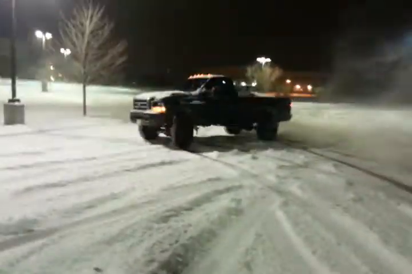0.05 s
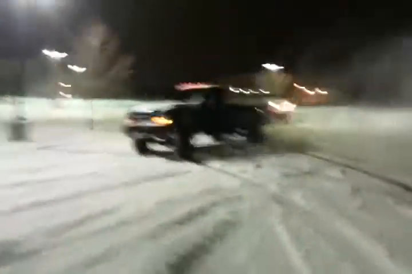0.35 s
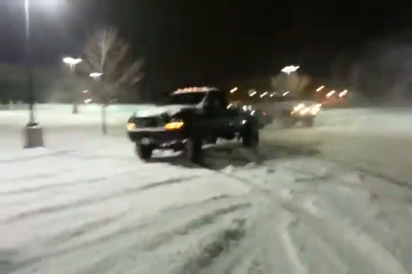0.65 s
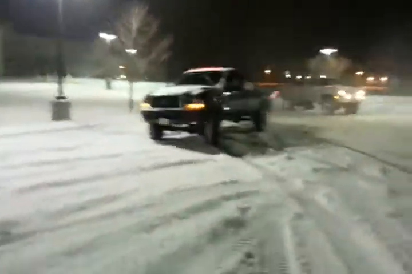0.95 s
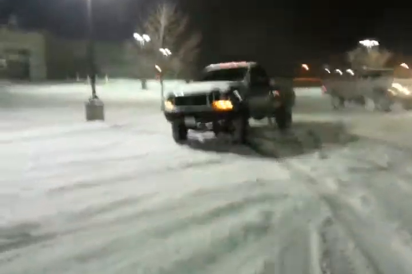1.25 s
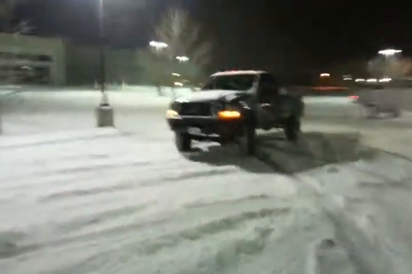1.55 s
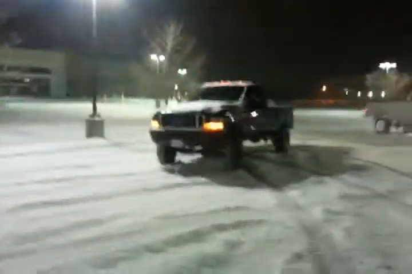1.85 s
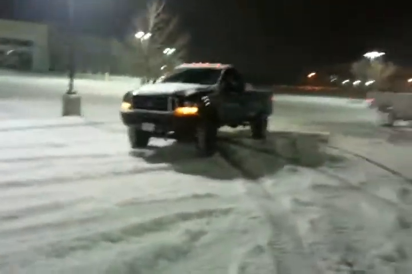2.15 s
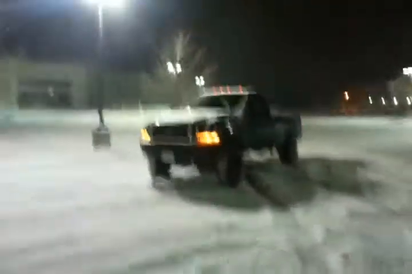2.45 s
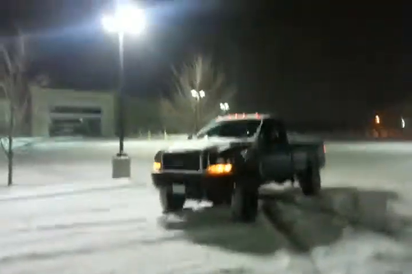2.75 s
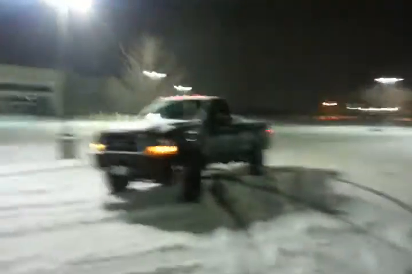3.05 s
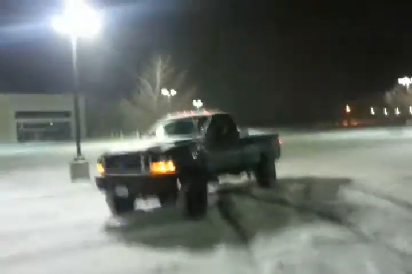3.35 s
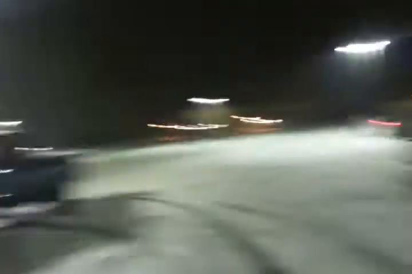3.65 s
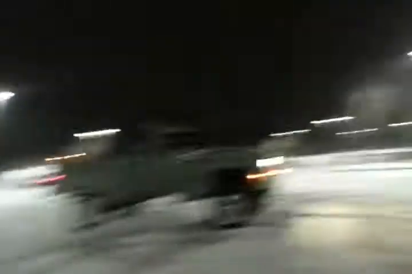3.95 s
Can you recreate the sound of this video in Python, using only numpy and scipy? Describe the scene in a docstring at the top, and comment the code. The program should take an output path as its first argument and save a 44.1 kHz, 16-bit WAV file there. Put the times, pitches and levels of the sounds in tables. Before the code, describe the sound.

A pickup truck's engine passes close by, with tyres churning snow throughout. Its turbo flutters in fast chuffs that slow, quicken and fade by 1.3 seconds. From about 1 second the exhaust swells into a deep, rising drone with some rasp and a faint hiss. Near 3 seconds it drops to a ragged burble. Around 3.7 seconds comes a dull snow scrunch, then a few sharp clicks on the right.

```python
"""A snowy car park, a V8 pickup sliding past close to a stereo microphone, tyres churning the snow.
First the turbo flutters: air blown back through it in fast chuffs that slow, quicken and die by 1.3 s
as the engine takes load. Uneven firings ring the exhaust pipe in a drone, with a rasp from the engine
bay and a hiss at the intake. Near 3 s, off the throttle, the drone falls into a ragged burble.
Last, a wheel ploughs through deeper snow and a few sharp clicks sound on the right."""
import sys
import numpy as np
from scipy import signal
from scipy.fft import rfft, irfft
from scipy.io import wavfile
from scipy.ndimage import uniform_filter1d

SR = 44100
rng = np.random.default_rng(int(sys.argv[2]) if len(sys.argv) > 2 else 0)


def file_out(sig):
    """Save sig as 16-bit WAV at sys.argv[1]."""
    # one column per channel
    cols = np.atleast_2d(sig).T
    # limit, then scale
    lim = np.clip(cols, -1, 1)
    pcm = np.round(lim * 32767).astype(np.int16)
    wavfile.write(sys.argv[1], SR, pcm)


N = 176400
T = np.arange(N) / SR

# engine speed (t/s, four-stroke cycles/Hz)
ENGINE_SPEED = [(0, 12.4), (.7, 12.2), (1.0, 15.1), (1.25, 17.1), (1.5, 18.3), (1.78, 18.6), (2.08, 18.6),
                (2.25, 19.95), (2.45, 19.6), (2.58, 20.2), (2.78, 20.55), (2.945, 19.6), (3.0, 16.2),
                (3.1, 14.6), (3.16, 17.6), (3.5, 17.5), (3.72, 14.5)]
# manner of firing (t/s, exponent on cylinder strength, roughness 0-1)
FIRING = [(0, 1.3, 0.26), (.85, 1.2, 0.32), (1.1, 0.21, 0.19), (1.4, 0.64, 0.16), (2.1, 1.1, 0.08),
          (2.3, 0.79, 0.11), (2.88, 0.98, 0.14), (3.05, 0.82, 0.14), (3.25, 1.3, 0.55)]
# cylinders in firing order (relative strength); (1 on the far bank, else 0)
CYLINDER_STRENGTH = [1.05, 1.48, 1.16, 0.77, 0.26, 2.3, 0.21, 1.58]
FAR_BANK = [1, 0, 1, 0, 0, 1, 0, 1]
# exhaust pipe resonances (f/Hz, gain/dB)
PIPE_COLOUR = [(25, -44), (60, -44.5), (100, -9), (130, 4), (155, 1.5), (185, -4), (220, -4), (265, -8.5),
               (312, -7), (345, -32), (400, -57), (700, -48), (1500, -78)]
# the pipe's low drone and the bark of its upper orders (t/s, level/dB)
DRONE_LEVEL = [(0, -38), (.45, -29.5), (.55, -17.5), (.66, -21.5), (.9, -20), (1.1, -11.5), (1.5, -10.5),
               (2.15, -10.5), (2.85, -16), (2.96, -10.5), (3.08, -11.5), (3.15, -20), (3.55, -22.5),
               (3.8, -16.5), (3.87, -59), (4, -23)]
BARK_LEVEL = [(0, -38.5), (.8, -40.5), (1.1, -22.5), (1.5, -21), (2.1, -20.5), (2.3, -18.5), (2.55, -15.5),
              (2.88, -14), (3.02, -30), (3.5, -21.5), (3.85, -29)]
# bearing of the exhaust from the microphone (t/s, left channel delay/s)
BEARING = [(1.1, 0), (1.7, -.00035), (2.8, -.00055), (3.6, .0005)]
# engine bay rasp under load (t/s, level/dB); (f/Hz, gain/dB)
RASP_LEVEL = [(1.5, -52), (2.7, -30.5), (3.1, -39.5)]
RASP_COLOUR = [(380, -35.5), (530, 8.5), (650, 12), (780, -28), (1070, 8), (1400, -15), (1720, 0),
               (2060, 5), (2400, -9), (4000, -39)]

# fast turbo flutter (t/s, chuff rate/Hz)
FLUTTER_RATE = [(0, 49.7), (.2, 48.8), (.35, 49.3), (.41, 45), (.47, 47.3), (.56, 47.3), (.6, 37.9),
                (.77, 37.9)]
# its low buzz, harmonics 1 to 4 (level/dB)
BUZZ_HARMONICS = [-29, -22, -40, -28.5]
# single gulps after the flutter (t/s, peak/dB)
GULPS = [(0.7755, -14), (0.8035, -15), (0.8366, -13), (0.8686, -13.5), (0.9076, -13), (0.9582, -13),
         (1.0184, -13), (1.084, -14), (1.133, -15), (1.166, -18), (1.1947, -18.5), (1.214, -19.5),
         (1.234, -20), (1.2544, -19), (1.277, -19), (1.298, -21)]
# chuffed air at the microphone (f/Hz, gain/dB); (f/Hz, left over right/dB); (f/Hz, coherence)
CHUFF_COLOUR = [(210, -29), (400, -6), (660, -1), (800, -9), (1050, -0.5), (1900, 3), (2310, -3.5),
                (2690, 0), (3200, -16), (4400, -18), (5600, -6.5), (5980, -8.5), (7050, 0.5), (7700, -6.5),
                (8400, -4), (9500, -18), (14500, -30)]
CHUFF_PAN = [(400, -0.5), (1100, -2), (1950, -5.5), (2700, -3), (3500, 4.5), (5000, 5), (7000, -22),
             (8700, -13.5), (14000, -33)]
CHUFF_COHERENCE = [(900, .87), (2300, .8), (5000, 0)]

# the truck's low rumble and the pipe's hollow burble, each (t/s, level/dB); (f/Hz, gain/dB)
RUMBLE_LEVEL = [(0, -24.5), (.6, -26.5), (1.3, -22), (1.5, -25.5), (2.85, -28), (3.25, -20.5)]
RUMBLE_COLOUR = [(20, -32), (36, -25), (50, -2.5), (80, 3.5), (200, 2), (400, -37), (900, -53)]
BURBLE_LEVEL = [(0, -55), (.6, -28.5), (1.1, -20), (1.5, -46), (2.9, -36), (3.0, -16.5), (3.17, -14),
                (3.41, -15), (3.53, -10), (3.58, -15.5), (3.88, -29)]
BURBLE_COLOUR = [(70, -34), (115, -3), (140, -2), (175, -26.5), (204, 1), (232, -16), (290, -22.5),
                 (380, -34.5), (700, -68)]

# tyres in snow, before their trims (t/s, churn/dB, spray/dB)
TYRE_LEVELS = [(0, -22, -27.5), (.7, -30.5, -36), (1.4, -30, -37.5), (1.8, -31.5, -38), (2.75, -28, -34.5),
               (3.07, -32, -40.5), (3.95, -34, -39.5)]
# crushed snow at the microphone (f/Hz, gain/dB); (f/Hz, left over right/dB); (f/Hz, coherence)
SNOW_COLOUR = [(220, -9.5), (400, -1), (650, -1), (800, -5), (1150, -2), (2050, -5.5), (3100, -13.5),
               (3900, -11), (5700, -14.5), (8400, -16), (11500, -23), (14500, -53)]
SNOW_PAN = [(600, 2), (1700, -6.5), (2700, 3.5), (4200, 6.5), (5800, -0.5), (7500, -11), (14000, -7)]
SNOW_COHERENCE = [(500, .85), (1600, .5), (4000, 0)]
# a wheel in deeper snow (t/s, width/s, peak/dB, f/Hz)
PLOUGH = (3.69, .04, -24.5, 390)

# intake hiss (t/s, level before trim/dB); (f/Hz, gain/dB)
HISS_LEVEL = [(1.1, -41.5), (2.85, -37.5), (3.09, -39), (3.5, -39.5), (3.95, -38.5)]
HISS_COLOUR = [(900, -3.5), (1500, -6.5), (2500, -1), (3200, -13.5), (5500, -17), (6500, -7), (7300, 2.5),
               (8100, -15.5), (10000, -26.5), (14000, -25.5)]
# spurts of air at the intake (t/s, peak/dB)
SPURTS = [(2.483, -29.5), (2.799, -30.5), (3.204, -23.5), (3.25, -27.5), (3.39, -24)]
# sharp clicks (t/s, peak/dB, lowest f/Hz, highest f/Hz)
CLICKS = [(3.7466, -18, 1500, 9000), (3.852, -25, 8500, 14000), (3.8971, -13, 500, 3500),
          (3.8985, -14, 600, 9000)]


def exhaust(bank_lag_cycles=.027, stumble_s=.0018, misfire_db=4, bark_above_hz=181.3):
    """Eight unequal firings a cycle, from two banks, ring the pipe and bay; off load they stumble."""
    speed = curve(ENGINE_SPEED)
    firing_count = np.floor(np.cumsum(speed) / SR * len(CYLINDER_STRENGTH))
    fired = np.flatnonzero(np.diff(firing_count))
    cylinder = np.arange(len(fired)) % len(CYLINDER_STRENGTH)
    stumble, misfire = rng.standard_normal((len(fired), 2)).T * curve(FIRING, column=2)[fired]
    late_s = np.take(FAR_BANK, cylinder) * bank_lag_cycles / speed[fired] + stumble_s * stumble
    strength = np.take(CYLINDER_STRENGTH, cylinder) ** curve(FIRING)[fired] * amp(misfire_db * misfire)
    pulses = np.bincount(np.abs(fired + late_s * SR).astype(int), strength, N)[:N]
    pipe = ring(pulses, PIPE_COLOUR)
    drone = signal.sosfiltfilt(signal.butter(8, bark_above_hz, fs=SR, output="sos"), pipe, padtype="even")
    bark = steady(pipe - drone) * amp(curve(BARK_LEVEL))
    right = steady(drone) * amp(curve(DRONE_LEVEL)) + bark + rasp(pulses)
    left = np.interp(T - curve(BEARING), T, right)
    return np.array([left, right]) * pan(-1.4)


def rasp(pulses, spit_s=.001, spit_db=-2.5):
    """Under load each firing, with a short spit of gas, rings the engine bay."""
    spit = signal.lfilter([1], [1, -np.exp(-1 / (spit_s * SR))], pulses) * noise()[0]
    bay = ring(unit(pulses) + amp(spit_db) * unit(spit), RASP_COLOUR)
    return steady(bay) * amp(curve(RASP_LEVEL))


def turbo(start_s=.007, jitter_s=.0007, flutter_db=-15.4):
    """Air chuffs back through the intake: an uneven fast flutter with a low buzz, then single gulps."""
    rate = curve(FLUTTER_RATE)
    running = (T > start_s) * (T < FLUTTER_RATE[-1][0])
    chuff_count = np.ceil(np.cumsum(rate * running) / SR)
    onsets = np.flatnonzero(np.diff(chuff_count))
    jitter, uneven_db = rng.standard_normal((len(onsets), 2)).T
    fast_chuffs = zip(T[onsets] + jitter_s * jitter, flutter_db + uneven_db)
    flutter_power = sum(chuff(s, db, decay_s=.009) ** 2 for s, db in fast_chuffs)
    gulp_power = sum(chuff(s, db, decay_s=.0093) ** 2 for s, db in GULPS)
    air = patchy(spread(noise(), CHUFF_COLOUR, CHUFF_COHERENCE, CHUFF_PAN), depth_db=1)
    phase = 2 * np.pi * np.cumsum(rate) / SR
    buzz = sum(amp(db) * np.sin(k * phase) for k, db in enumerate(BUZZ_HARMONICS, 1))
    buzz_fade = uniform_filter1d(running * 1., size=8000)
    return np.sqrt(flutter_power + gulp_power) * air + buzz * buzz_fade * pan(-2.3)


def chuff(start_s, db, decay_s, attack_s=.0034, hold_s=.0027, tail_db=-11.5, tail_s=.038):
    """Envelope of one gulp of air: a quick rise, a fast fall and a softer tail."""
    age = np.maximum(T - start_s, 0)
    fall = np.maximum(age - attack_s - hold_s, 0)
    decay = np.hypot(np.exp(-fall / decay_s), amp(tail_db) * np.exp(-fall / tail_s))
    return amp(db) * np.minimum(age / attack_s, 1) * decay


def rumble_and_burble():
    """The truck rumbles over packed snow, and its pipe burbles off load."""
    layers = (RUMBLE_COLOUR, RUMBLE_LEVEL), (BURBLE_COLOUR, BURBLE_LEVEL)
    return sum(steady(spread(noise(), colour, coherence=[(1, .61)], balance=[(1, 0)])) * amp(curve(level))
               for colour, level in layers) * pan(-2)


def tyres(grains_per_s=900, grain_spread_db=19, crunch_db=-8, spray_above_hz=3060):
    """Tyres crush the snow in dense grains: a dull churn and a finer spray."""
    grains = (rng.random((2, N)) < grains_per_s / SR) * noise()
    grains *= amp(grain_spread_db * np.minimum(rng.exponential(1, (2, N)), 2))
    crunch = noise() + amp(crunch_db) * unit(grains)
    snow = patchy(spread(crunch, SNOW_COLOUR, SNOW_COHERENCE, SNOW_PAN), depth_db=2)
    churn = signal.sosfiltfilt(signal.butter(4, spray_above_hz, fs=SR, output="sos"), snow)
    churn_db, spray_db = curve(TYRE_LEVELS) + 1, curve(TYRE_LEVELS, column=2) + 2  # trims
    return unit(churn) * amp(churn_db) + unit(snow - churn) * amp(spray_db)


def plough():
    """A wheel ploughs through deeper snow with a short dull scrunch, dead centre."""
    peak_s, width_s, db, hz = PLOUGH
    scrunch = unit(band(noise()[0], hz / 2, hz * 1.5))
    return scrunch * amp(db) * np.exp(-.5 * ((T - peak_s) / width_s) ** 2)


def intake(hiss_trim_db=-1):
    """Right of the microphone, air drawn through the spinning turbo hisses and escapes in spurts."""
    hiss = spread(noise(), HISS_COLOUR, coherence=[(1500, .3), (7000, 1)],
                  balance=[(1500, -9), (7000, -28)])
    hiss_power = amp(curve(HISS_LEVEL) + hiss_trim_db) ** 2
    spurt_power = sum(chuff(s, db, decay_s=.021) ** 2 for s, db in SPURTS)
    return patchy(hiss, depth_db=4.5) * np.sqrt(hiss_power + spurt_power)


def clicks(decay_s=.0012):
    """Dry ticks, well to the right, that die within a few milliseconds."""
    return sum(unit(band(noise()[0], lo, hi)) * amp(db) * (T >= s) * np.exp(-abs(T - s) / decay_s)
               for s, db, lo, hi in CLICKS) * pan(-14)


def amp(db):
    """Decibels to gain."""
    return 10 ** (np.asarray(db) / 20)


def unit(x):
    """Scales to rms 1."""
    return x / np.sqrt(np.mean(x ** 2) + 1e-20)


def steady(x):
    """Evens out the slow level to rms 1."""
    return x / np.sqrt(uniform_filter1d(uniform_filter1d(x ** 2, size=4800), size=4800) + 1e-12)


def curve(rows, column=1):
    """One column of a time table, at every sample."""
    rows = np.array(rows)
    return np.interp(T, rows[:, 0], rows[:, column])


def at_hz(points, hz):
    """Reads a spectrum table on a log-frequency axis."""
    f, value = np.transpose(points)
    return np.interp(np.log(hz + 1), np.log(f + 1), value)


def pan(db):
    """Channel gains for a level of left over right."""
    ratio = amp(np.atleast_1d(db))
    return 2 * np.array([ratio, np.ones_like(ratio)]) / (1 + ratio)


def ring(x, colour):
    """Minimum-phase filter with the given colour."""
    log_gain = np.log(amp(at_hz(colour, abs(np.fft.fftfreq(2 ** 14, 1 / SR)))))
    response = np.fft.ifft(np.exp(np.conj(signal.hilbert(log_gain)))).real
    return signal.fftconvolve(x, response[:len(response) // 2])[:N]


def band(x, lo_hz, hi_hz):
    """Band-pass."""
    return signal.sosfilt(signal.butter(2, [lo_hz, hi_hz], "band", fs=SR, output="sos"), x)


def noise():
    """Two channels of white noise."""
    return rng.standard_normal((2, N))


def spread(pair, colour, coherence, balance):
    """Colours two unrelated signals and makes them a partly alike stereo pair."""
    hz = np.fft.rfftfreq(N, 1 / SR)
    left, other = rfft(pair)
    alike = np.clip(at_hz(coherence, hz), -1, 1)
    right = alike * left + np.sqrt(1 - alike ** 2) * other
    gains = pan(at_hz(balance, hz))
    mid_gain = np.sqrt((gains ** 2).sum(0) + 2 * alike * gains.prod(0) + 1e-9)
    stereo = irfft(np.array([left, right]) * gains / mid_gain * amp(at_hz(colour, hz)), N)
    return stereo / stereo.mean(0).std()


def patchy(x, depth_db):
    """Random patches of level over time and frequency."""
    spectra = signal.stft(x, nperseg=512)[2]
    patches = unit(uniform_filter1d(uniform_filter1d(rng.standard_normal(spectra.shape[1:]), 7, 0), 5, 1))
    return signal.istft(spectra * amp(depth_db * patches), nperseg=512)[1][:, :N]


def scene():
    """The truck at close range in the open car park."""
    return exhaust() + rumble_and_burble() + turbo() + tyres() + plough() + intake() + clicks()


def record(dry):
    """The microphone signal, clipped at full scale and cut above 14.7 kHz."""
    low_pass = signal.firwin(401, 14700, window=("kaiser", 8), fs=SR)
    return signal.oaconvolve(np.clip(dry, -1, 1), low_pass[None], "same")


dry = scene()
out = record(dry)
file_out(out)
```